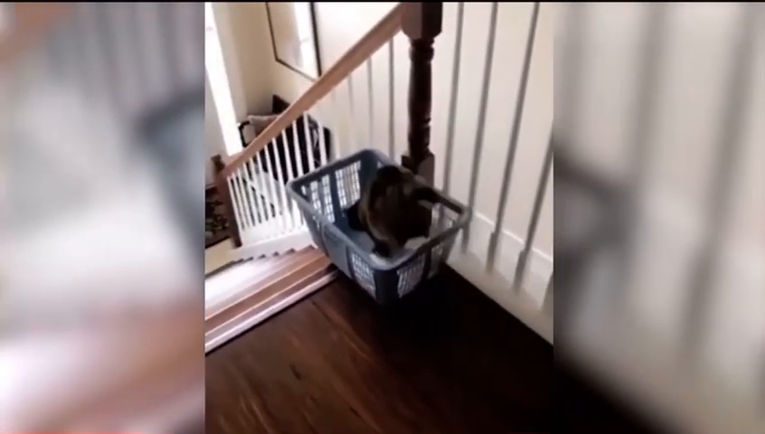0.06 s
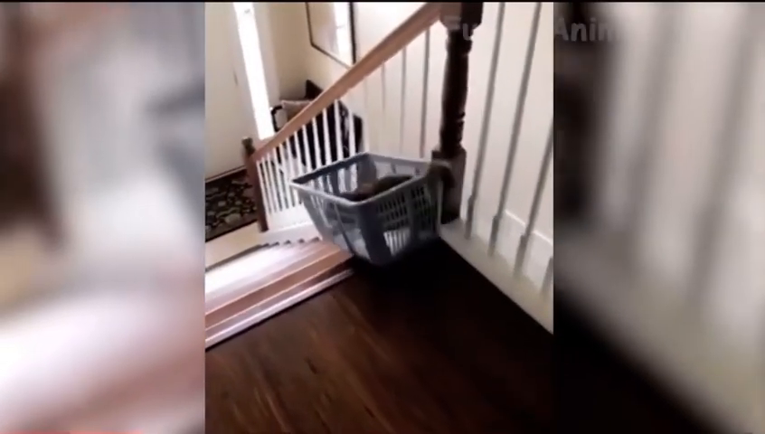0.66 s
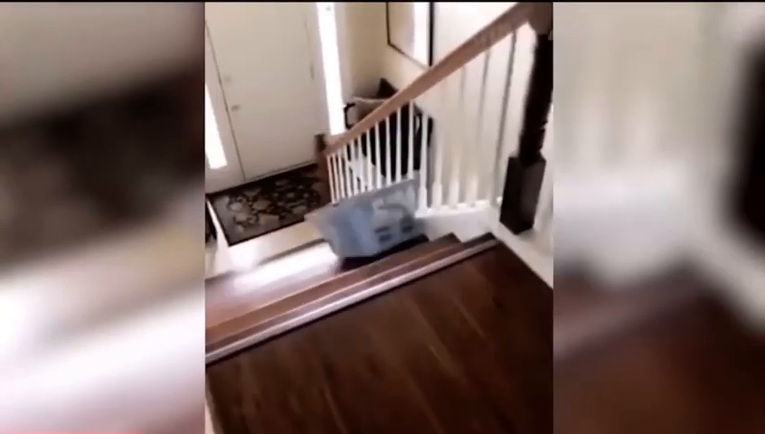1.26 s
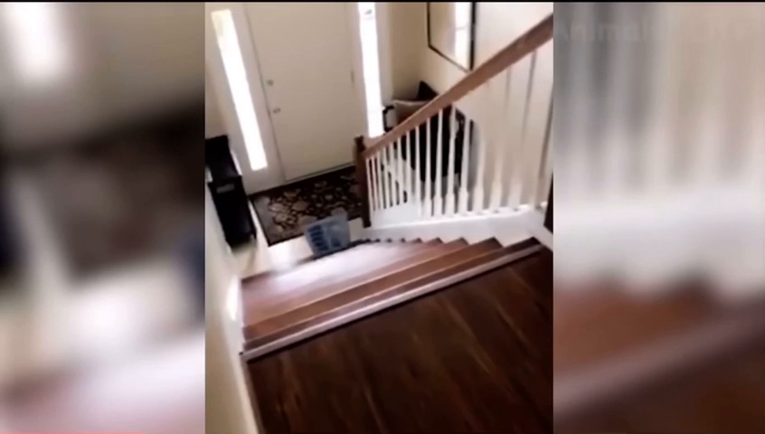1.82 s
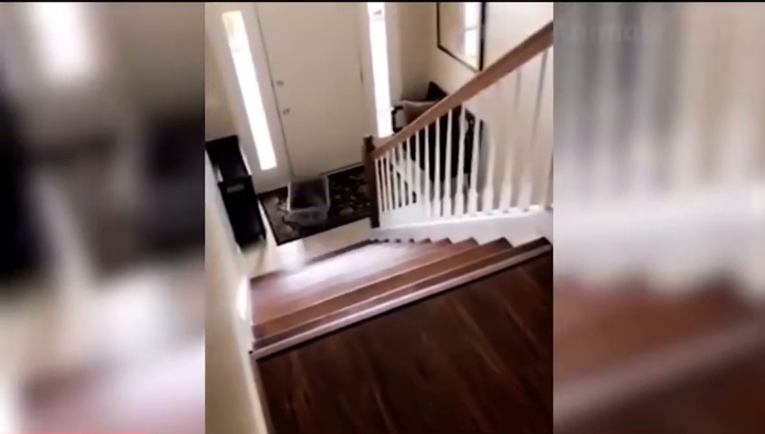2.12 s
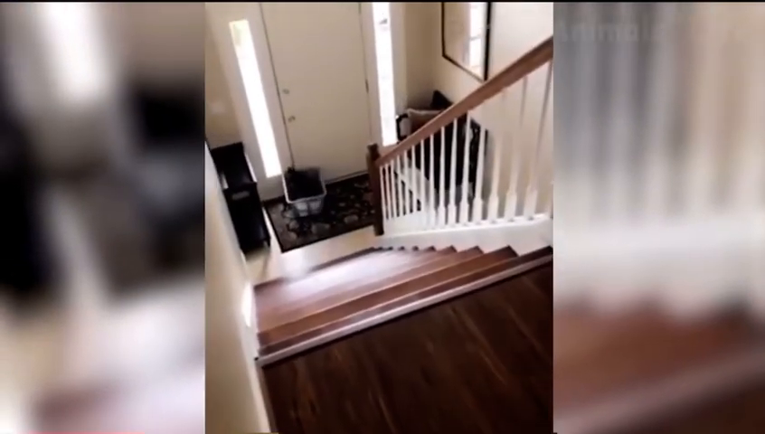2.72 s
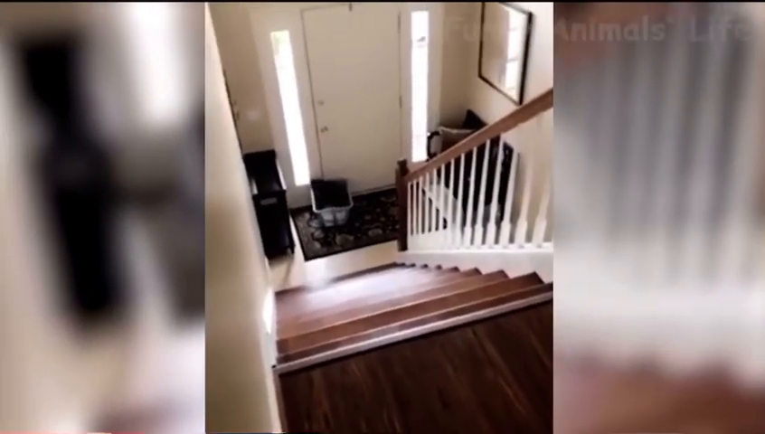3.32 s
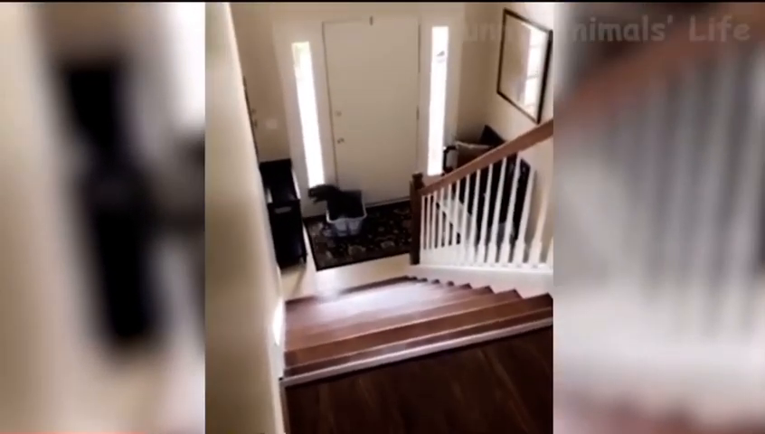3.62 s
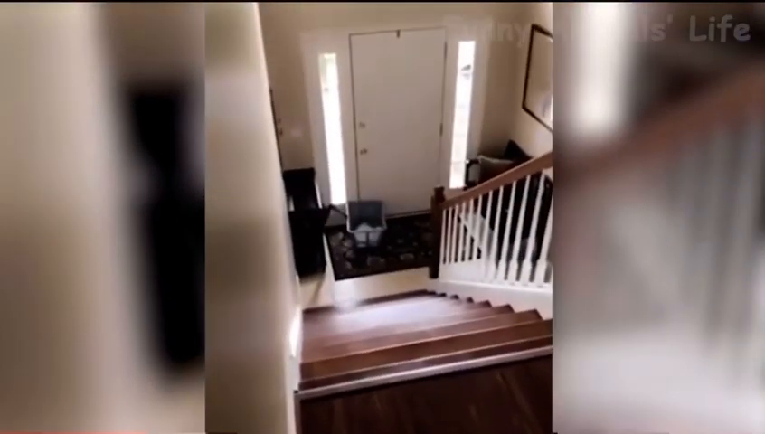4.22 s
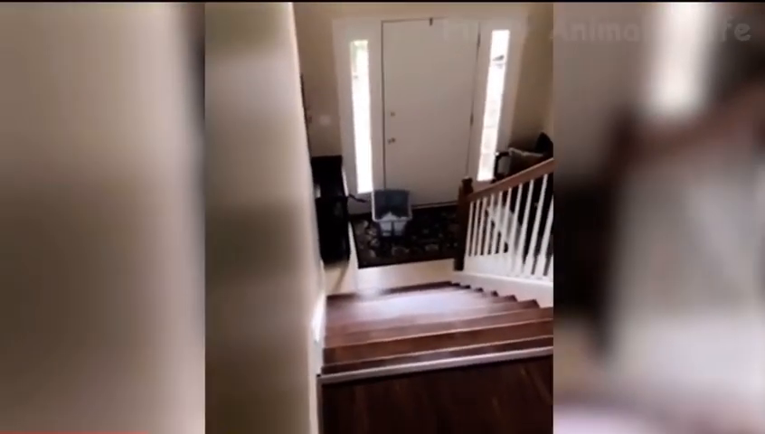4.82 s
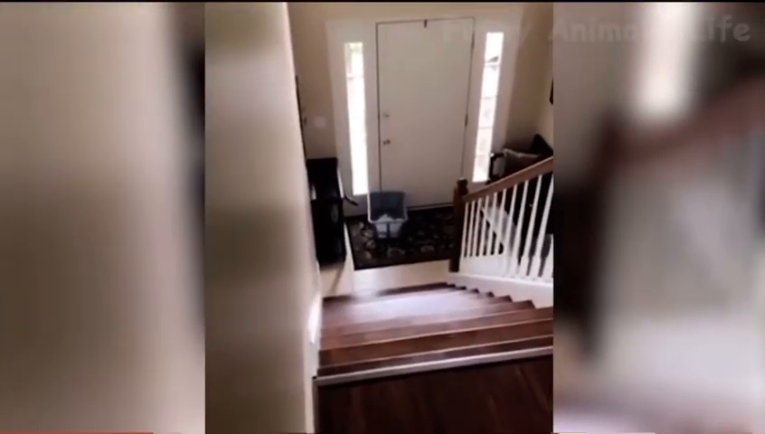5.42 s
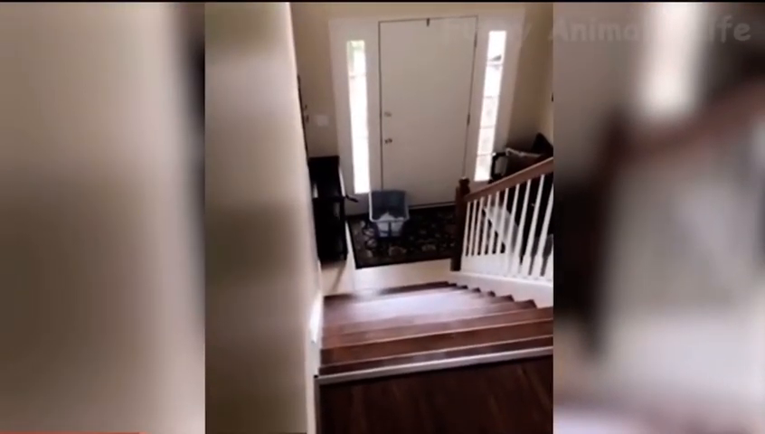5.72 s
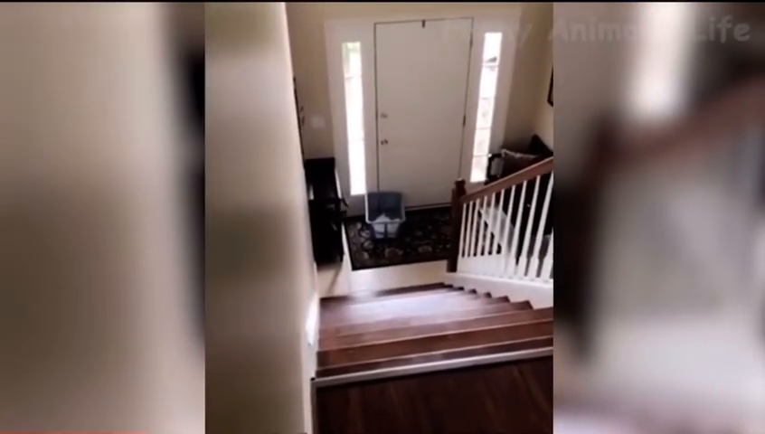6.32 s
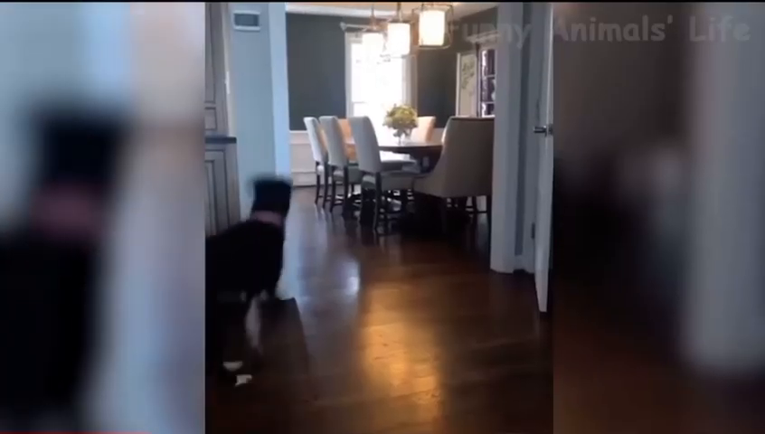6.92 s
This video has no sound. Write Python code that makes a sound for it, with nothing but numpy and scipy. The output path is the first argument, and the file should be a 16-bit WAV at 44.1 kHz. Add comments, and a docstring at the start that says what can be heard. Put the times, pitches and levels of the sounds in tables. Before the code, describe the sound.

A plastic laundry basket slides down a wooden staircase in a growing, scraping clatter of thumps, landing heavily in a reverberant hall with a low background rumble and hiss. After a short last slide, a pet leaves it with two faint hollow knocks. Two crisp smacks snap nearby, then two light ticks. The background drops to a quieter room, where a dog's paws softly skid, pad and click across floorboards.

```python
"""In an echoing hall, a plastic laundry basket scrapes over a landing, bumps down wooden stairs and
crashes onto the floor. Impacts excite the modes of the wood and rattle the shell; stick-slip friction
makes the scraping. The basket knocks hollowly as the pet inside jumps out, and two sharp smacks sound
close by. Then, in a quieter room, a dog's paws pad over wooden boards and slip with a faintly
ringing hiss. A low rumble and hiss fill both rooms."""
import sys
import numpy as np
from scipy import signal
from scipy.io import wavfile
from scipy.ndimage import uniform_filter1d

SR = 44100
rng = np.random.default_rng(int(sys.argv[2]) if len(sys.argv) > 2 else 0)


def digitize_waveform(pressure):
    """Quantize a signal to 16-bit integers and store it at the path in sys.argv[1].

    Rows of a 2-D input are taken as channels; values are limited to [-1, 1].
    """
    field = np.atleast_2d(pressure).T
    bounded = np.clip(field, -1, 1)
    quanta = np.round(bounded * 32767).astype(np.int16)
    wavfile.write(sys.argv[1], SR, quanta)


N = 315578
TIME = np.arange(N) / SR
RING = np.arange(int(1.5 * SR)) / SR  # time axis of a single hit [s]


# Modes of the wooden boards: (frequency [Hz], level [dB], T60 [s])
WOOD_MODES = [(152, -1, 0.25), (183, 2.5, 0.22), (212.7, 1.5, 0.3), (233.7, -0.5, 0.15), (257, 0.5, 0.17),
              (290.6, -2, 0.24), (316, -1.5, 0.2), (343.2, 1, 0.23), (371, 1, 0.14), (398, -3.5, 0.15),
              (500, -16, 0.076), (594, -1, 0.21), (690, -0.5, 0.12), (813, -2.5, 0.12), (874, -5, 0.28)]
def thud(centre_hz, octaves, damping, punch):
    """Modal superposition: the spot struck favours modes near centre_hz; damping divides their T60."""
    hz, db, t60 = np.transpose(WOOD_MODES)[:, :, None]
    detune, phase = rng.uniform(-1.03, 1, (2, len(WOOD_MODES), 1))
    weight = amp(db) / (1 + (np.log2(hz / centre_hz) / octaves) ** 4)
    tuned_hz = hz * (1 + 0.014 * detune)  # each board differs slightly in pitch
    modes = weight * decay(t60 / damping) * np.sin(2 * np.pi * tuned_hz * RING + 1.95 * phase)
    attack = 1 - np.exp(-RING / 0.0028)
    contact = 1 + punch * np.exp(-RING / 0.0091)
    return modes.sum(0) * attack * contact


def boom(hz, t60):
    """Damped oscillation: one low mode of a floor or staircase builds up and dies away."""
    return damped_sine(hz, t60) * (1 - np.exp(-RING / 0.0067))


# The basket's ends strike wood: (time [s], level [dB], centre frequency [Hz], damping [ratio])
BASKET_IMPACTS = [(.014, -44.5, 247, 1.2), (.37, -53, 380, 1.3), (.53, -37, 265, 1.7),
                  (.568, -44, 230, 1.8), (.939, -23.5, 265, 2.6), (.964, -23.5, 240, 1.15),
                  (1.018, -31, 290, 1.2), (1.329, -33.5, 310, 1.2), (1.386, -22.5, 270, 2),
                  (1.404, -24, 190, 1.3), (1.445, -26.5, 328, 1.4), (1.53, -34, 370, 1.3),
                  (1.598, -33, 373, 1.3), (1.649, -20, 340, 1.8), (1.663, -16.5, 276, 2.2),
                  (1.672, -27, 670, 1.7), (1.715, -28.5, 650, 1.4), (1.733, -25, 300, 1.4),
                  (1.919, -34, 230, 1.384), (1.955, -35, 610, 1.2), (2.008, -25.5, 345, 1.1),
                  (2.041, -22, 305, 1.3), (2.051, -30, 480, 2.4), (2.068, -25.5, 260, 1.7),
                  (2.112, -18.5, 176, 1.17), (2.128, -32.5, 640, 3), (2.156, -29, 200, 1.7),
                  (2.204, -38, 590, 4), (2.478, -33, 260, 1.3), (2.51, -37, 310, 1.2), (2.555, -40, 230, 1)]
# Steps left ringing by the hardest drops: (time [s], level [dB], frequency [Hz], T60 [s])
RINGING_STEPS = [(.945, -24, 214, .55), (.99, -34, 312, .65), (1.4, -21, 181, .33), (1.66, -23.5, 243, .35),
                 (1.652, -28, 343, .42)]
# The two ends land on the hall floor: (time [s], level [dB])
FLOOR_IMPACTS = [(2.051, -18.5), (2.136, -17)]
# Modes of the hall floor: (frequency [Hz], relative level [dB], T60 [s])
FLOOR_MODES = [(47.6, -2, 0.41), (59.8, -6.5, 1.12), (65, 2.5, .38), (80, 0.5, 0.31), (113, -2, 0.25)]
def basket_knocks():
    """Impact excitation: the loaded basket sets treads, staircase and floor into free vibration."""
    out = np.zeros(N)
    for start, db, hz, damping in BASKET_IMPACTS:
        knock = thud(hz, octaves=0.46, damping=damping, punch=0.32)
        add(out, start, at_level(knock + reverb(knock, wet_db=-6), db))
        add(out, start, amp(db - 18) * boom(hz=48.2, t60=1))  # the whole staircase
    for start, db, hz, t60 in RINGING_STEPS:
        add(out, start, amp(db) * boom(hz, t60))
    for start, db in FLOOR_IMPACTS:
        add(out, start, sum(amp(db + mode_db) * boom(hz, t60) for hz, mode_db, t60 in FLOOR_MODES))
    return out


# Spectrum of the plastic shell: (frequency [Hz], gain [dB])
SHELL_SPECTRUM = [(30, -33.5), (100, 1.5), (200, 0), (350, 0), (480, -3.5), (900, -3), (1400, -0.5),
                  (2000, -4.5), (3100, -11), (4500, -13), (6500, -14), (8200, -22.5), (11500, -32.5)]
# Resonances of its walls: (frequency [Hz], bandwidth [Hz], gain [dB])
WALL_RESONANCES = [(1400, 250, 0.56), (1660, 73, 1.5), (2290, 140, 1.4), (2500, 83, 3.4), (3480, 100, 0.68)]
# Slides over landing, stairs and floor: (start [s], fastest [s], stop [s], level [dB],
# tilt [dB/octave], board resonance [dB], entry speed [fraction of top speed])
BASKET_SLIDES = [(.55, .695, .79, -35, -1.3, 3.5, .18), (.76, .936, .95, -43, -1, 3, .5),
                 (0.937, 2.1, 2.26, -32, 1.9, 10.5, .45), (2.32, 2.48, 2.62, -37, .2, -1.5, .3)]
def basket_slides():
    """Stick-slip friction: dense slips drive walls and boards, with amplitude proportional to speed."""
    slips = grains(N, per_s=4500, spread_db=2)
    notch = (740, 350, -3)  # weak response between the resonances of boards and walls
    rub = np.zeros(N)
    for start, fastest, stop, db, tilt, board_db, entry in BASKET_SLIDES:
        speed = np.interp(TIME, [start, fastest, stop], [entry, 1, 0], left=0)
        boards = (360, 156, board_db)
        scrape = colour(slips, SHELL_SPECTRUM, [*WALL_RESONANCES, notch, boards], tilt)
        rub += amp(db) * speed * scrape / rms(scrape)
    rub *= amp(0.85 * wobble(samples=600))  # the contact judders
    return rub + reverb(rub, wet_db=-4)


def chatter(decay_s, crack):
    """Repeated collision: plastic strikes wood in dying succession; crack boosts the first contact."""
    envelope = np.exp(-RING / decay_s) + crack * np.exp(-RING / 0.0042)
    return grains(len(RING), per_s=1800, spread_db=3) * envelope


# Wall rattles: (time [s], level [dB], tilt [dB/octave], decay time [s], first-contact boost [ratio])
WALL_RATTLES = [(0.013, -46.5, 0, 0.032, .4), (.53, -43.5, -5, 0.035, 0.3), (0.938, -29.5, -2.7, 0.048, 0),
                (1.016, -31.5, -3.5, 0.045, 0), (1.215, -41, 1.5, .03, 0), (1.326, -27, 0.6, 0.07, .4),
                (1.394, -26.5, -3.5, 0.027, 0.74), (1.455, -32.5, -3, 0.022, 0.3),
                (1.597, -31, 0, 0.046, 0.039), (1.652, -26, -0.6, 0.028, 0), (1.661, -22.3, -6, .05, 0),
                (1.933, -34.5, -4, 0.063, .3), (2.046, -24.5, -2.5, 0.034, 0.008),
                (2.115, -20.3, 2.4, 0.024, .15), (2.142, -24.5, 0, 0.016, 0), (2.157, -21, -.6, 0.024, .2),
                (2.478, -42, -4, 0.04, 0.14)]
def basket_rattles():
    """Shell vibration: drops rattle the walls; the hardest flex the whole shell into a hollow clap."""
    out = np.zeros(N)
    for start, db, tilt, decay_s, crack in WALL_RATTLES:
        flex = (1850, 1300, 1.17 * max(db + 25.5, 0))
        rattle = colour(chatter(decay_s, crack), SHELL_SPECTRUM, [*WALL_RESONANCES, flex], tilt)
        add(out, start, at_level(rattle + reverb(rattle, wet_db=0.5), db))
    return out


# The pet pushes off and lands: (time [s], level [dB], tilt [dB/octave], decay time [s])
PET_JUMPS = [(3.688, -48, .6, 0.015), (3.886, -51.5, -3.5, 0.01)]
# Resonances of the emptied basket: (frequency [Hz], bandwidth [Hz], gain [dB])
EMPTY_RESONANCES = [(1410, 100, 2.5), (2120, 90, 3), (4300, 1600, 5)]
def pet_jumps():
    """Shell resonance: the light basket knocks hollowly as the pet jumps out."""
    out = np.zeros(N)
    for start, db, tilt, decay_s in PET_JUMPS:
        knock = colour(chatter(decay_s, crack=0.52), SHELL_SPECTRUM, EMPTY_RESONANCES, tilt)
        add(out, start, at_level(knock + reverb(knock, wet_db=1.5), db))
    return out


# Sharp smacks nearby: (time [s], level [dB], duration [s])
SMACK_EVENTS = [(5.363, -33.5, .0075), (5.52, -26, .0115)]
# Spectrum of their direct sound: (frequency [Hz], gain [dB])
SMACK_SPECTRUM = [(100, -37), (600, -12.5), (1000, -14.5), (1400, -1), (3000, .5), (4600, -10.5), (6600, 2),
                  (9000, -17.5), (12000, -14)]
# Spectrum they send into the hall: (frequency [Hz], gain [dB])
ECHO_SPECTRUM = [(200, -18), (1000, -8), (1700, -5), (2300, -8), (3300, -11.5), (4700, -9), (5900, 1),
                 (7000, 1), (8000, -5), (9000, -14), (12000, -18)]
# Resonances in that echo: (frequency [Hz], bandwidth [Hz], gain [dB])
ECHO_RESONANCES = [(1319, 120, 6), (1733, 130, 7.5), (2130, 80, 5), (2800, 100, 5), (3520, 120, 5),
                   (6700, 500, 2.5)]
def smacks():
    """Cavity resonance: a crackle ends in a pop that falls as a small cavity opens; the hall hisses."""
    out = np.zeros(N)
    for start, db, length in SMACK_EVENTS:
        swell = np.minimum(RING / length + 0.25, 1) / (1 + (RING / length) ** 14)
        crackle = grains(len(RING), per_s=8400, spread_db=5.5) * swell
        direct = unit_energy(colour(crackle, SMACK_SPECTRUM))
        snap = signal.unit_impulse(len(RING), np.argmax(swell))
        echo = unit_energy(colour(snap, ECHO_SPECTRUM, ECHO_RESONANCES))
        pop_hz = 450 + 3800 * np.exp(-RING / 0.00127)
        pop = np.sin(2 * np.pi * np.cumsum(pop_hz) / SR) * np.exp(-RING / 0.0025)
        add(direct, 0.84 * length, amp(-7.5) * unit_energy(pop))
        add(out, start, amp(db) * np.sqrt(length * SR) * (direct + reverb(echo, wet_db=-10)))
    return out


# Footfalls: (time [s], pad level [dB], centre frequency [Hz], claw level [dB], scuff decay time [s])
PAW_STEPS = [(6.624, -76, 250, -60, .035), (6.661, -54.5, 210, -70, .02), (6.712, -59, 205, -64, .02),
             (6.826, -58, 480, -62, .012), (6.838, -49, 165, -72, .01), (6.913, -56, 189, -59, .01),
             (6.928, -59, 188, -58.5, .01), (6.95, -48, 125, -57, .035), (7.061, -60, 440, -75, .02),
             (7.080, -55, 104, -76, .01), (7.118, -68, 151, -64, .035), (7.146, -70, 150, -61, .02)]
# Spectrum of claws on wood: (frequency [Hz], gain [dB])
CLAW_SPECTRUM = [(100, -25), (500, 8), (1000, 3.5), (2000, 2.5), (3600, -0.5), (5000, -3.5), (7500, -8),
                 (12000, -17)]
def paw_steps():
    """Damped impact: soft pads strike and deaden the boards while the claws tick and scuff."""
    out = np.zeros(N)
    for start, pad_db, hz, claw_db, decay_s in PAW_STEPS:
        pad = thud(hz, octaves=0.5, damping=1.8, punch=0)
        scuff = grains(len(RING), per_s=2400, spread_db=2.5) * np.exp(-RING / decay_s)
        claw = colour(scuff, CLAW_SPECTRUM)
        add(out, start, amp(pad_db - 2.5) * boom(hz=94, t60=0.35))  # the floor under the pad
        add(out, start, at_level(pad + reverb(pad, wet_db=-8), pad_db))
        add(out, start, at_level(claw + reverb(claw, wet_db=-5.5), claw_db))
    return out


def soft_rub(swell_s, db, spectrum, resonances=()):
    """Friction noise: fine, even slips swell and fade over swell_s = (start, peak, end)."""
    hiss = colour(grains(N, per_s=4000, spread_db=0.5), spectrum, resonances)
    rub = hiss / rms(hiss) * np.interp(TIME, swell_s, [0, 1, 0])
    return amp(db) * (rub + reverb(rub, wet_db=-5.5))


SKID_S = (6.6, 6.712, 6.82)  # start, peak, end
# Spectrum of slipping paws: (frequency [Hz], gain [dB])
SKID_SPECTRUM = [(200, -10), (500, -15), (1000, -8), (1500, -1), (1850, -10), (2300, -5), (3200, -2.5),
                 (4600, -9), (7000, -2), (8000, -8), (8800, -21), (12000, -18)]
# Its resonances: (frequency [Hz], bandwidth [Hz], gain [dB])
SKID_RESONANCES = [(1530, 220, 7), (3250, 450, 4.5)]
def paw_skid():
    """Sliding friction: the dog's paws slip on the boards with a hiss."""
    return soft_rub(SKID_S, db=-52.5, spectrum=SKID_SPECTRUM, resonances=SKID_RESONANCES)


# Ringing tones in the skid: (frequency [Hz], relative level [dB], T60 [s])
SKID_RING_MODES = [(1465, -1, .25), (1583, 0, .4), (2654, -5, .3), (3090, -3, .15), (3150, -2, .25),
                   (3284, -2, .4), (6298, -6, .15), (6912, -5, .12)]
def skid_ringing():
    """Randomly driven resonance: faint, narrow tones ring in the hiss of the skid."""
    start, _, end = SKID_S
    drive = grains(N, per_s=500, spread_db=1.5) * np.interp(TIME, SKID_S, [0.3, 1, 0], left=0)
    out = np.zeros(N)
    for hz, db, t60 in SKID_RING_MODES:
        mode = signal.fftconvolve(drive, damped_sine(hz, t60))[:N]
        out += amp(db) * mode / rms(mode)
    return amp(-60) * out / rms(out[(TIME > start) & (TIME < end)])


# Spectrum of a soft touch on the basket: (frequency [Hz], gain [dB])
BRUSH_SPECTRUM = [(200, -3), (1300, 4), (2200, 6), (3300, 2), (4300, -10), (7000, -11), (12000, -24)]
def basket_rustle():
    """Light friction: something soft brushes the basket just after it comes to rest."""
    return soft_rub((2.83, 2.945, 3.04), db=-56.5, spectrum=BRUSH_SPECTRUM)


# Faint ticks: (time [s], level [dB], frequency [Hz])
FAINT_TICKS = [(5.863, -42, 2860), (5.980, -40, 2230), (6.552, -60, 4500)]
def ticks():
    """Heavy damping: a tone that dies within a few cycles is heard as a dry click."""
    out = np.zeros(N)
    for start, db, hz in FAINT_TICKS:
        add(out, start, amp(db) * np.sin(2 * np.pi * hz * RING) * np.exp(-RING / 0.0011))
    return out


# Reverberation time by band: (frequency [Hz], T60 [s])
REVERB_T60 = [(60, 0.49), (200, 0.76), (500, 0.78), (1200, 1.02), (3000, 0.9), (7000, 0.61), (12000, 0.47)]
def reverb(x, wet_db):
    """Diffuse reverberation: dense reflections decay exponentially, each band at its own rate."""
    hz, t, bands = signal.stft(rng.standard_normal(len(RING)), SR, nperseg=512)
    bands = bands * amp(-60 * t / value_at(REVERB_T60, hz)[:, None])
    tail = signal.istft(bands, SR, nperseg=512)[1][:len(RING)]
    tail *= 1 - np.exp(-RING / 0.0026)
    return amp(wet_db) * signal.fftconvolve(x, unit_energy(tail))[:len(x)]


# Background spectra of the hall and the quieter room: (frequency [Hz], gain [dB])
HALL_NOISE = [(12, -44), (20, -3), (42, -3), (108, -2.5), (137, -9.5), (170, -10), (211, -15),
              (268, -15.5), (510, -26), (1050, -27), (1610, -29), (2150, -30), (3100, -40), (4700, -47),
              (6100, -43), (7800, -49.5), (11400, -51), (12000, -66), (15600, -74), (22000, -120)]
ROOM_NOISE = [(20, -8), (60, 0), (220, -4), (400, -12), (1500, -16), (3000, -22), (7000, -28),
              (12000, -38)]
def house_noise(room_change_s=6.555):
    """Broadband ambient noise: wavering rumble and hiss, first of the hall, then of the quieter room."""
    hall = colour(rng.standard_normal(N + SR), HALL_NOISE)[SR:]
    room = colour(rng.standard_normal(N + SR), ROOM_NOISE)[SR:]
    noise = np.where(TIME < room_change_s, amp(-47) * hall / rms(hall), amp(-60) * room / rms(room))
    return amp(0.53 * wobble(samples=7000)) * noise


def colour(x, spectrum, resonances=(), tilt=0, size=8192):
    """Minimum-phase filtering by a spectrum, resonance peaks and a tilt [dB/octave] above 700 Hz."""
    hz = abs(np.fft.fftfreq(size, 1 / SR))
    db = value_at(spectrum, hz) + tilt * np.log2(np.maximum(hz, 700) / 1500)
    db += sum(gain / (1 + (2 * (hz - centre) / width) ** 2) for centre, width, gain in resonances)
    response = np.exp(np.conj(signal.hilbert(np.log(amp(db)))))
    taps = np.fft.ifft(response).real[:size // 2]
    return signal.fftconvolve(x, taps)[:len(x)]


def grains(count, per_s, spread_db):
    """Shot noise: impulses of random time, sign and size, at unit RMS."""
    chance, size, sign = rng.random((3, count))
    strength = amp(spread_db * np.minimum(-np.log(size + 1e-9), 4))
    impulses = (chance < per_s / SR) * np.sign(sign - 0.5) * strength
    return impulses / rms(impulses)


def wobble(samples):
    """Random modulation: a moving average of noise, at unit RMS."""
    curve = uniform_filter1d(rng.standard_normal(N), size=samples)
    return curve / rms(curve)


def damped_sine(hz, t60):
    """Impulse response of a single mode."""
    return decay(t60) * np.sin(2 * np.pi * hz * RING)


def decay(t60):
    """Exponential decay by 60 dB in t60 seconds."""
    return amp(-60 * RING / t60)


def value_at(table, hz):
    """Interpolation on a logarithmic frequency axis."""
    table_hz, values = np.transpose(table)
    return np.interp(np.log(hz + 1), np.log(table_hz + 1), values)


def amp(db):
    """Amplitude ratio of a level in decibels."""
    return 10 ** (np.asarray(db) / 20)


def rms(x):
    """Effective amplitude: the root mean square."""
    return np.sqrt(np.mean(x ** 2) + 1e-20)


def unit_energy(x):
    """Normalisation to a total energy of one."""
    return x / np.linalg.norm(x)


def at_level(hit, db):
    """Normalisation of a hit by the RMS level of its first 60 ms."""
    return amp(db) * hit / rms(hit[:round(0.06 * SR)])


def add(mix, start_s, sound):
    """Superposition of a delayed sound on the mix."""
    part = mix[round(start_s * SR):][:len(sound)]
    part += sound[:len(part)]


def scene():
    """Linear superposition of all sources, the same in both ears."""
    basket = basket_slides() + basket_knocks() + basket_rattles() + basket_rustle() + pet_jumps()
    clicks = smacks() + ticks()
    dog = paw_skid() + skid_ringing() + paw_steps()
    return np.tile(basket + clicks + dog + house_noise(), (2, 1))


def record(dry):
    """Attenuation and band limiting: the level dips briefly once, and a low-pass cuts the top treble."""
    dip = np.where((TIME > 5.938) & (TIME < 5.979), amp(-31), 1.0)
    gain = uniform_filter1d(dip, size=60)
    lowpass = signal.firwin(301, cutoff=11900, window=("kaiser", 8), fs=SR)
    return signal.oaconvolve(dry * gain, lowpass[None], "same")


dry = scene()
out = record(dry)
digitize_waveform(out)
```